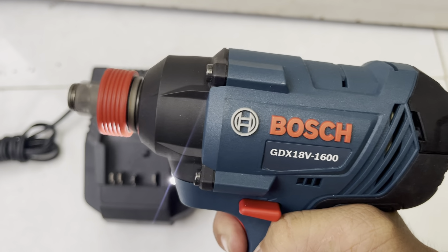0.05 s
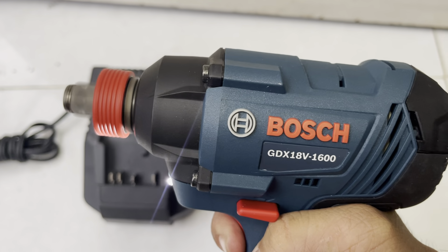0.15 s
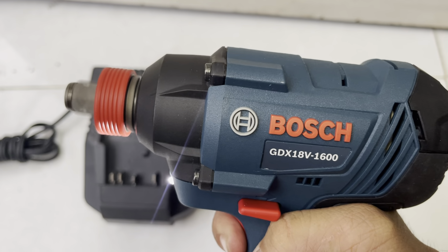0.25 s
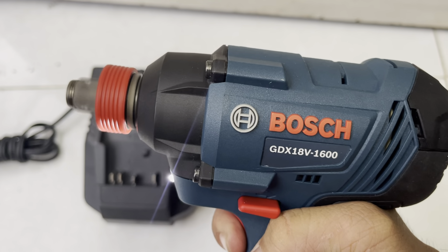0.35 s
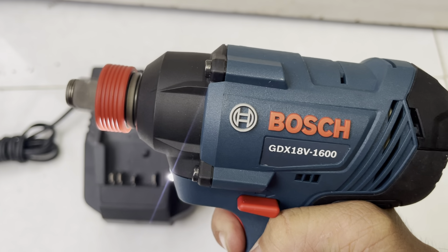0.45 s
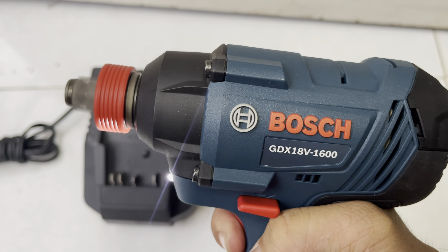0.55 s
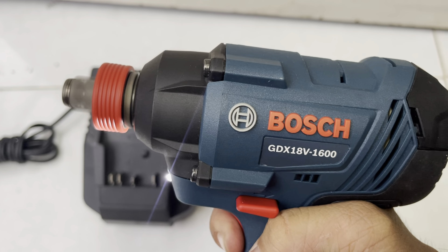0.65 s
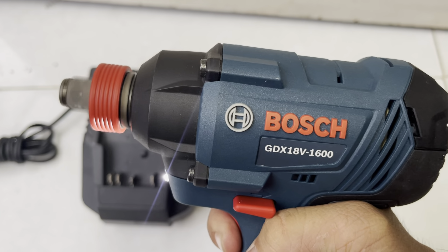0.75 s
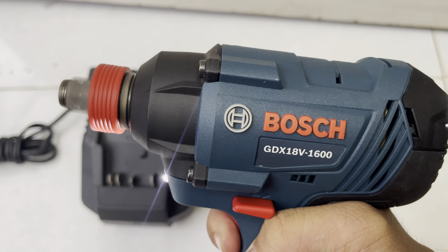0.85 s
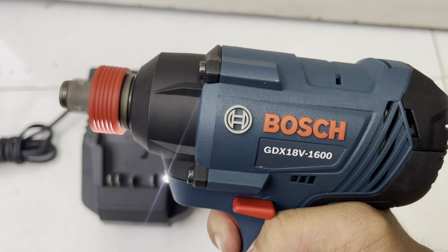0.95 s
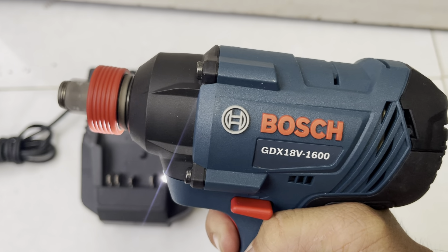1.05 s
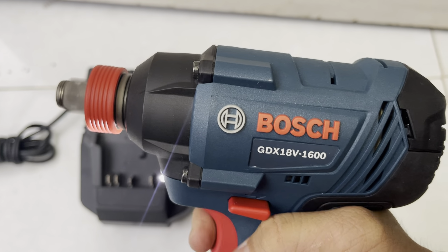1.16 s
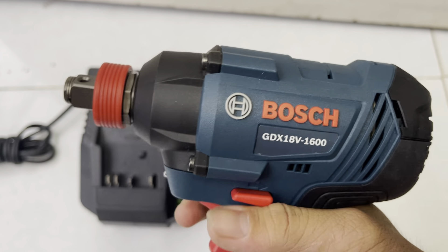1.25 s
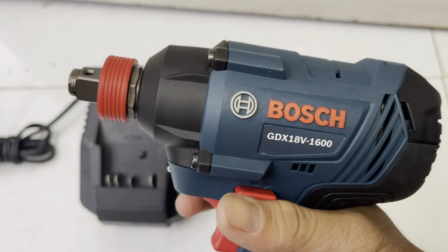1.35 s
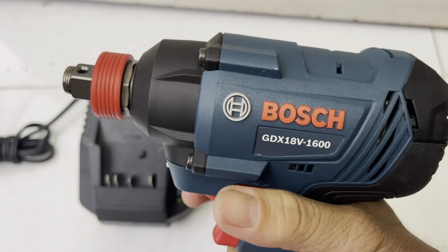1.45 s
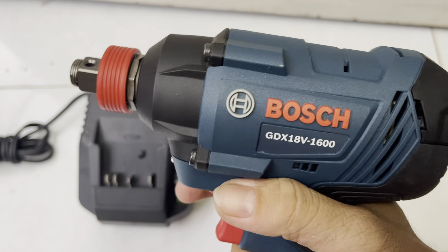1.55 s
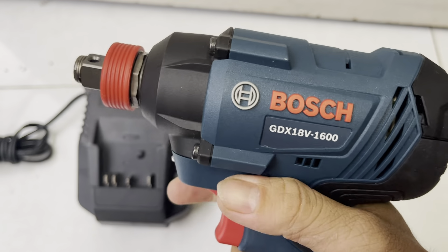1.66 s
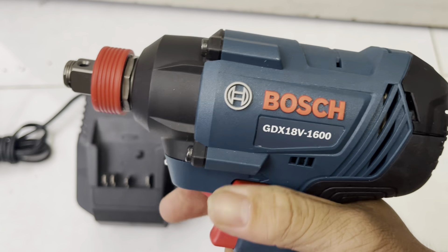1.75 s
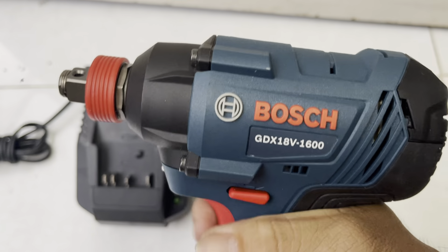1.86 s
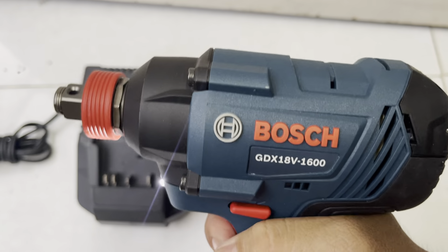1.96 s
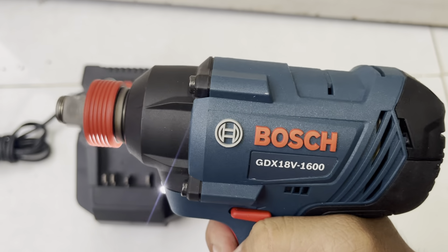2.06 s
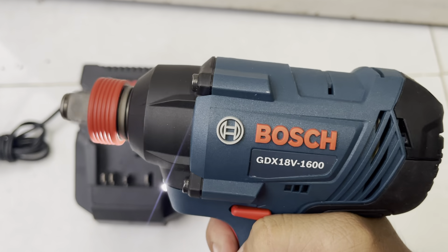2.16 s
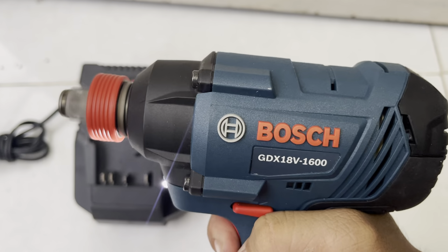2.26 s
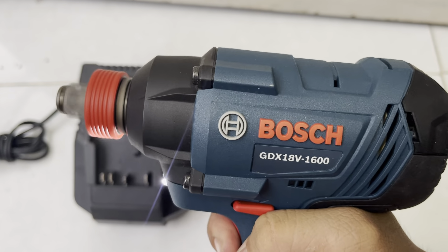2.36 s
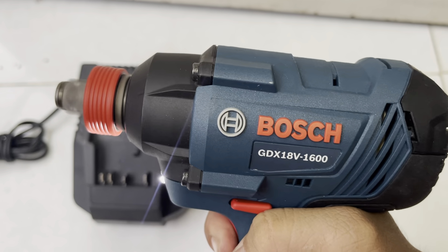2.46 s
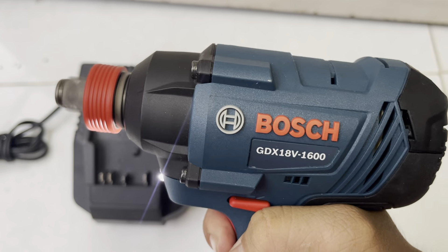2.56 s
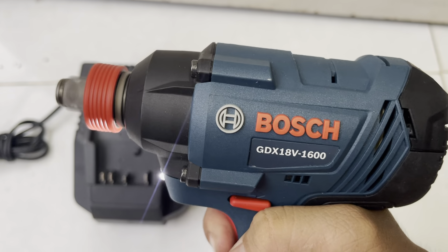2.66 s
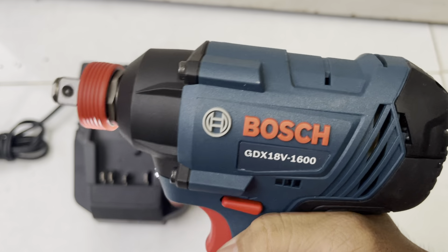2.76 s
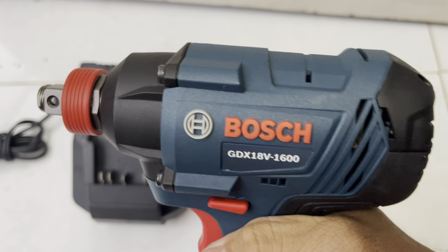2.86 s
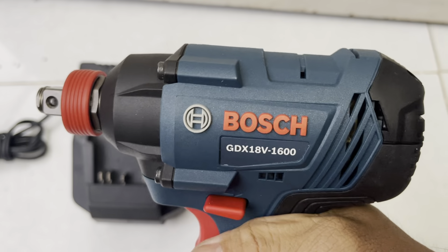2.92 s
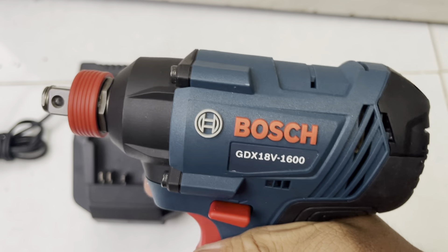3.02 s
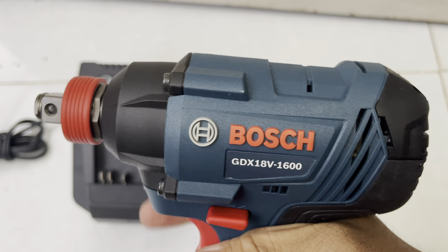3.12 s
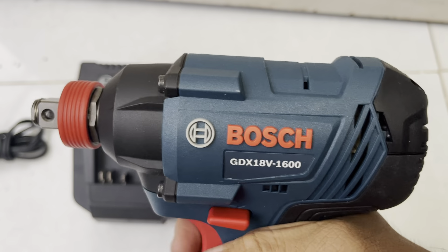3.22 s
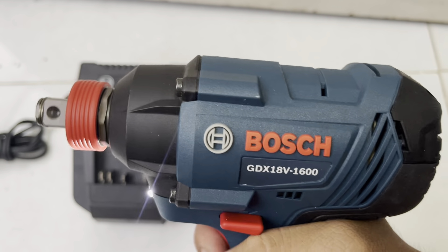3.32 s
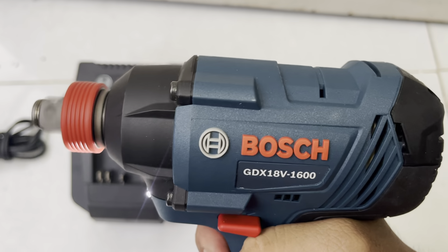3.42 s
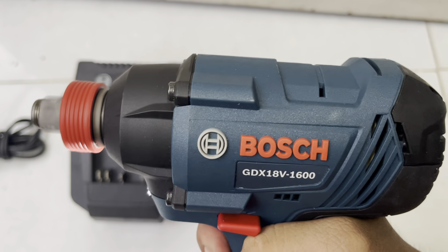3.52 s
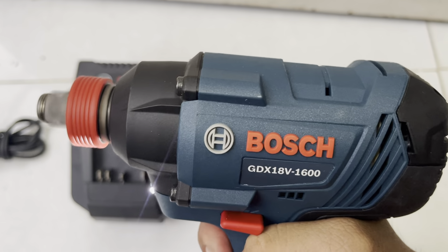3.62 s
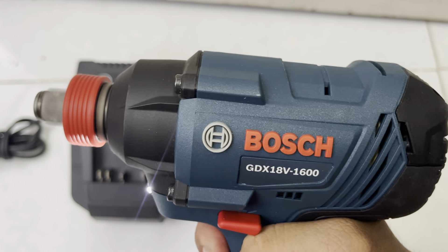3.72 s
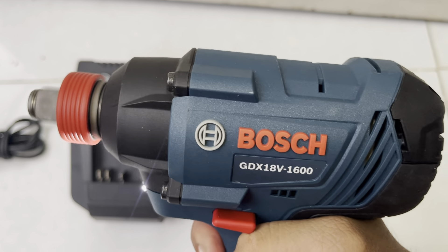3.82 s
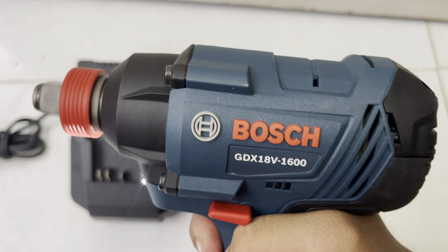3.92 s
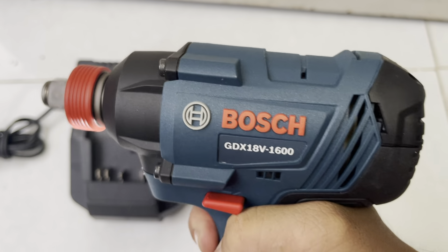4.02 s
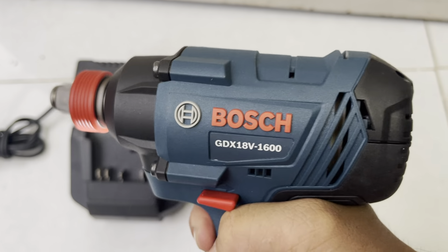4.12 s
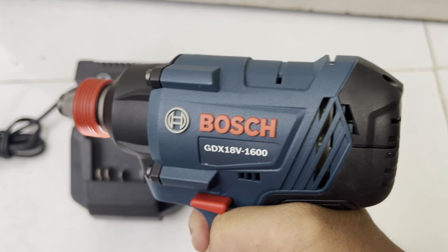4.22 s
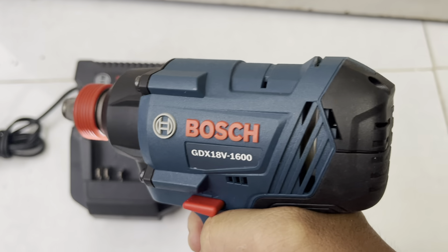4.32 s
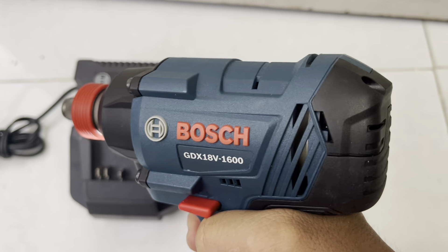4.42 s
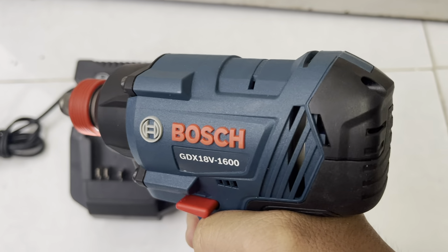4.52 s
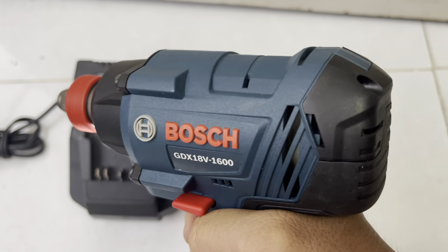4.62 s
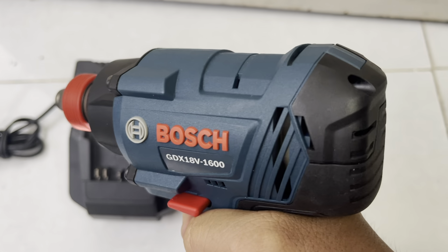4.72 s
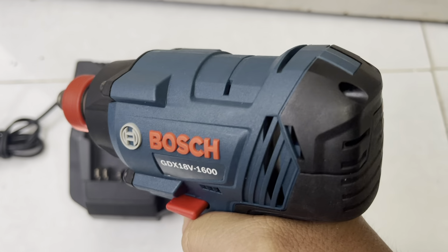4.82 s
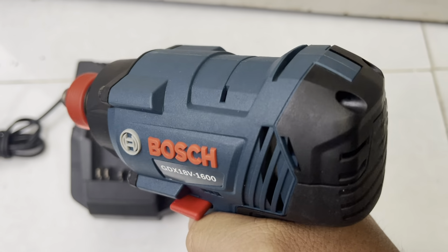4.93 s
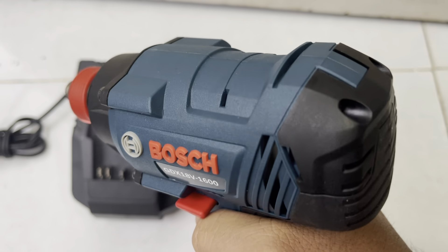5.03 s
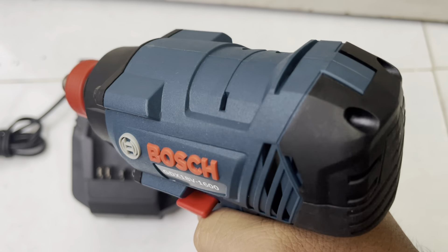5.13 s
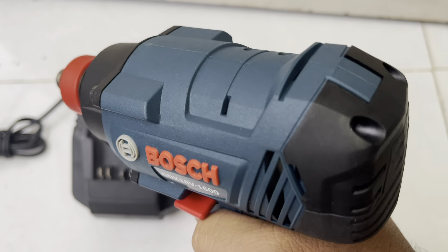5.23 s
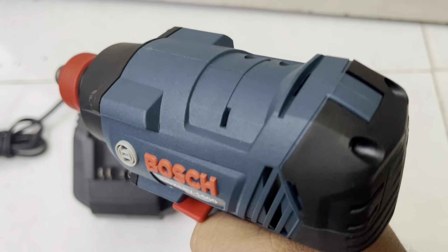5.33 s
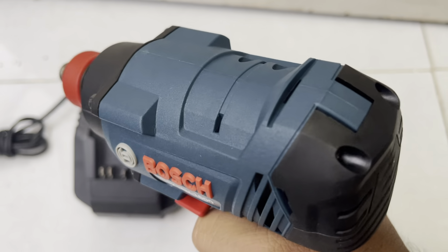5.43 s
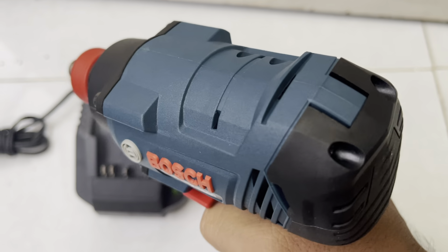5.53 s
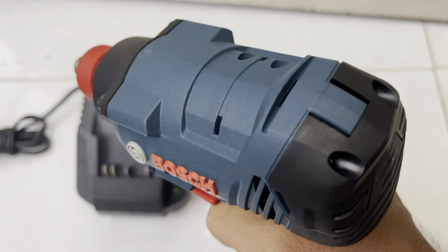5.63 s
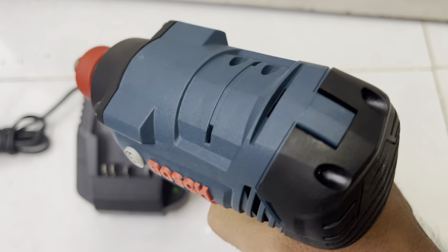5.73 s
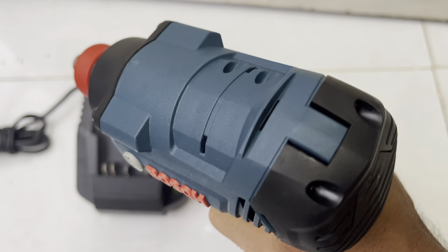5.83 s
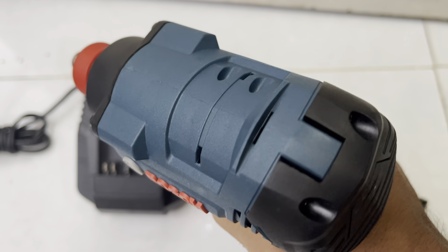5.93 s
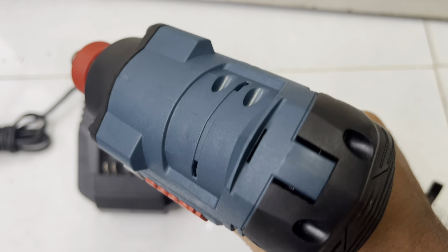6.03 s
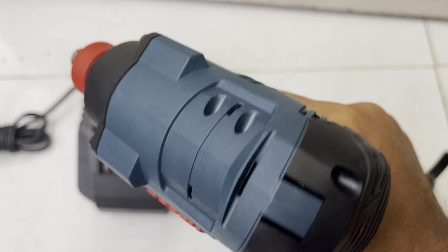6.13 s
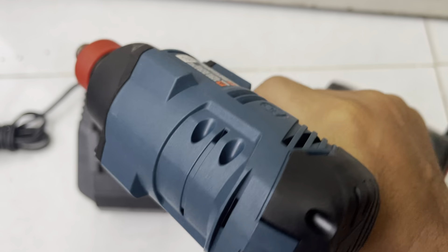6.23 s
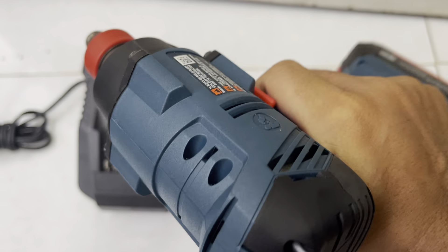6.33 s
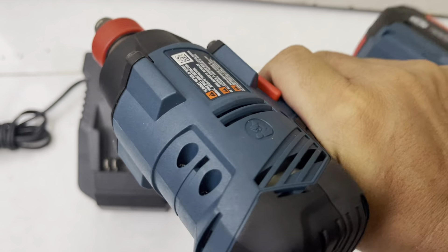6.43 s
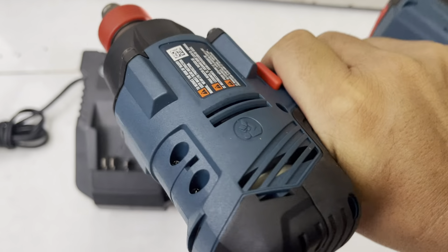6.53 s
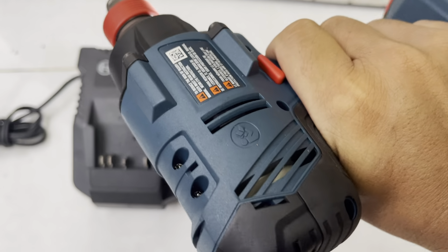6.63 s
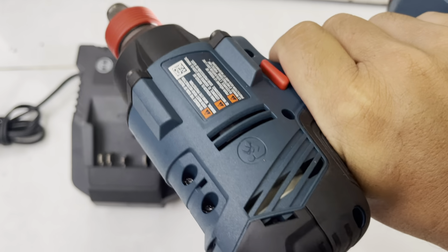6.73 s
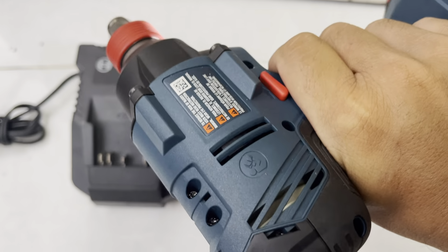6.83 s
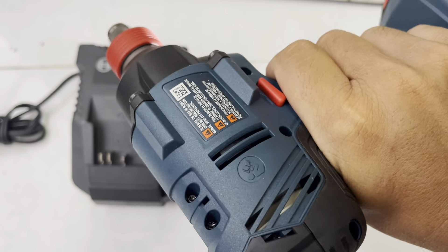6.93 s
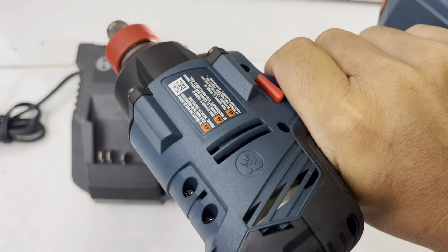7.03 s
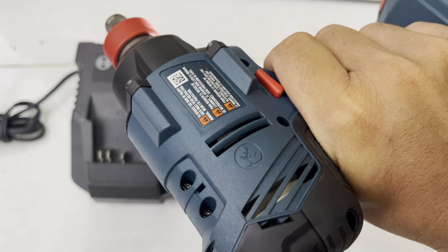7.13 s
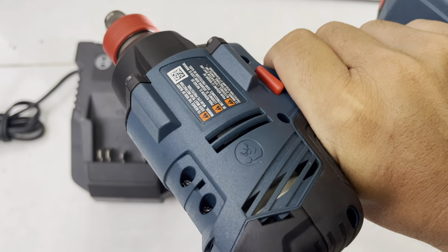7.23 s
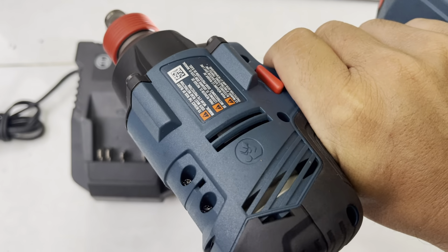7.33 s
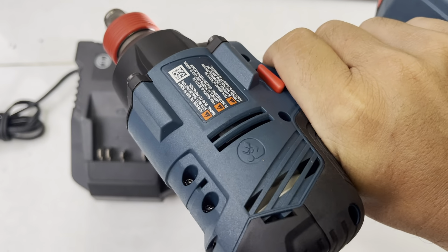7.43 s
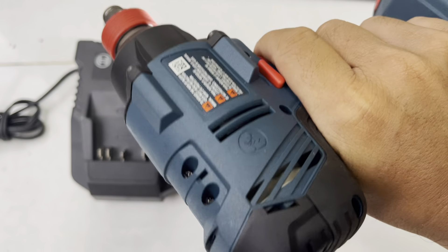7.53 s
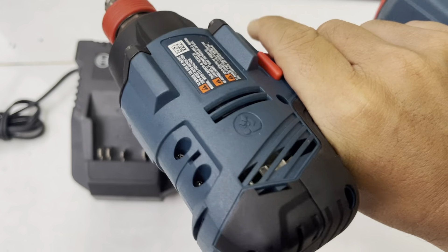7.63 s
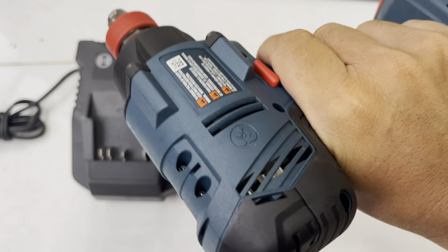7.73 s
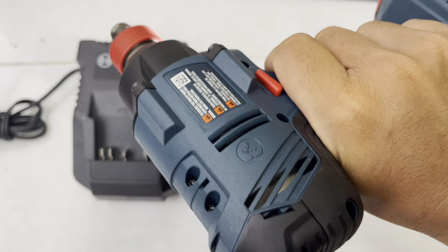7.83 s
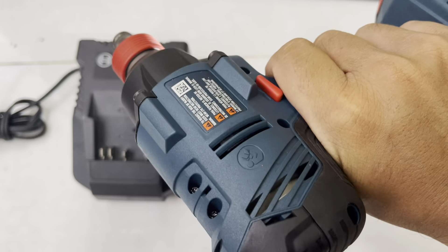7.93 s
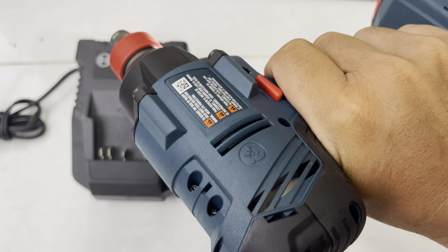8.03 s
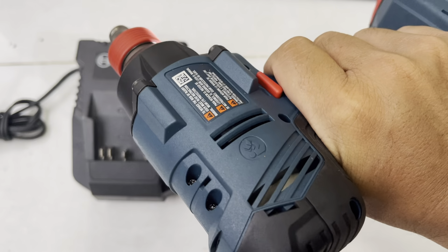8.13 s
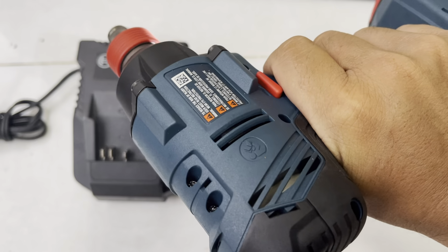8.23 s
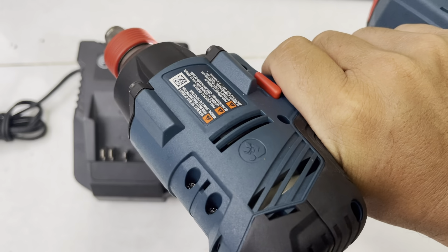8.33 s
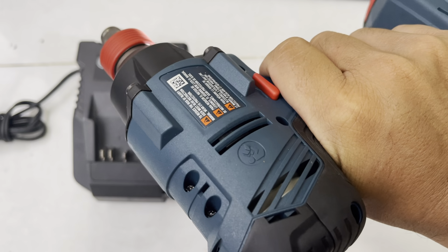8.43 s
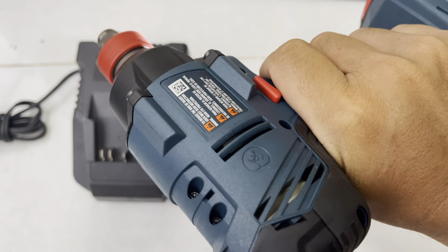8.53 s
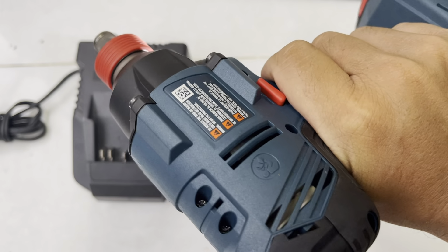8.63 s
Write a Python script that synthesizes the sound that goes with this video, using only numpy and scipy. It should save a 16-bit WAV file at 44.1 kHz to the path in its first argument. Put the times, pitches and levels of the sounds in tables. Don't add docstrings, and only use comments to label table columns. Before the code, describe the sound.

An unloaded battery impact driver runs a hand's width from the microphone, its gear whine over buzzy brush noise and fan hiss. It brakes abruptly, clicks, runs slightly lower in reverse, brakes and snaps into a long forward run. Midway, low windy puffs buffet the microphone and the gear tone softens. A brief stop precedes a final run; a faint distant engine hums beneath, with a short tiled-room tail.

```python
import sys
import numpy as np
from scipy import signal
from scipy.fft import rfft, irfft
from scipy.io import wavfile
from scipy.ndimage import uniform_filter1d

SR = 44100
rng = np.random.default_rng(int(sys.argv[2]) if len(sys.argv) > 2 else 0)


def natural_amplitude(level_db):
    exponent = np.asarray(level_db, float) / 20
    return 10 ** exponent


def wav_record(signal):
    frames = np.transpose(np.atleast_2d(signal))
    bounded = np.clip(frames, -1, 1)
    quanta = np.round(bounded * 32767).astype(np.int16)
    wavfile.write(sys.argv[1], SR, quanta)


N = 382347

# squeezed in seconds, released in seconds, starting whine in dB, whine order per shaft turn.
PULLS = [
    (-1, 1.208, -50, 29.5),
    (1.975, 2.748, -39, 20.3),
    (3.371, 7.543, -53, 30.5),
    (7.833, 9.5, -54, 29.5),
]
CARRIER = 9 / 64
BRAKE_HZ_PER_S = 3900


def unit(x):
    return x / np.sqrt(np.mean(x ** 2))


def band(x, lo_hz, hi_hz, order=2):
    return signal.sosfilt(signal.butter(order, [lo_hz, hi_hz], "bandpass", fs=SR, output="sos"), x)


def colour(x, points):
    hz, db = np.transpose(points)
    f_hz = np.arange(N // 2 + 1) * SR / N
    return irfft(rfft(x) * natural_amplitude(np.interp(np.log(f_hz + 1), np.log(hz), db)), N)


def zone(x, lo_hz, hi_hz):
    f_hz = np.arange(N // 2 + 1) * SR / N
    mask = (np.tanh((f_hz - lo_hz) / 250) - np.tanh((f_hz - hi_hz) / 250)) / 2
    return irfft(rfft(x) * mask, N)


def walk(rate_hz):
    hold = int(SR / rate_hz)
    steps = np.repeat(rng.standard_normal(N // hold + 1), hold)
    return 1.69 * uniform_filter1d(uniform_filter1d(steps, hold), hold)[:N]


def curve(table):
    s, *columns = np.transpose(table)
    return [np.interp(np.arange(N) / SR, s, c) for c in columns]


def tone(turns, multiple, wobble_db, rate_hz):
    phase = 2 * np.pi * (multiple * turns + rng.random())
    return np.sqrt(2) * natural_amplitude(wobble_db * walk(rate_hz)) * np.cos(phase)


def decay(times_s, gains, t60s):
    env, t = np.zeros(N), np.arange(4096) / SR
    for s, gain, t60 in zip(times_s, gains, t60s):
        i = int(s * SR)
        env[i:i + 4096] += gain * np.exp(-np.log(1000) * t / max(t60, .002))
    return env


def pan(x, left_minus_right_db):
    return x * natural_amplitude(np.outer([.5, -.5], left_minus_right_db))


def shaft(free_hz):
    spin_up_hz_per_s, settle_s = 1600, .045
    t = np.arange(N) / SR
    hz, whine, order = np.zeros((3, N))
    knee_hz = spin_up_hz_per_s * settle_s
    for start_s, stop_s, whine_db, multiple in PULLS:
        past_hz = spin_up_hz_per_s * (t - start_s) - free_hz + knee_hz
        eased_hz = knee_hz * np.exp(-np.maximum(past_hz, 0) / knee_hz)
        short_hz = np.where(past_hz < 0, knee_hz - past_hz, eased_hz)
        braked_hz = BRAKE_HZ_PER_S * np.maximum(t - stop_s, 0)
        hz += np.maximum(free_hz - short_hz - braked_hz, 0)
        powered = (t > start_s) * (t < stop_s)
        whine += natural_amplitude(whine_db) * np.minimum(short_hz / knee_hz, 1) ** 2 * powered
        order[t > start_s] = multiple
    return hz, whine, np.cumsum(hz * order) / SR


def brush_and_fan_noise(turns):
    # frequency in Hz, level in dB per Hz.
    housing = [(150, -38.5), (500, -11), (1100, -2), (1450, 1), (1800, -4), (2500, 1), (3300, -4.5),
               (4000, -18.5), (4800, -13), (5600, -14.5), (7000, -13.5), (9700, -4.5), (11200, -5),
               (13000, -17.5)]
    puff = 1 + 0.12 * np.cos(2 * np.pi * turns) + 0.05 * np.cos(4 * np.pi * CARRIER * turns)
    sparks = natural_amplitude(2.0 * np.minimum(rng.exponential(size=N), 6))
    return colour(rng.standard_normal(N) * puff * sparks, housing)


def vent_cavity(noise, rumble_db):
    # centre in Hz, width in Hz, rows of time in seconds and level in dB over the rumble.
    cavity = (1425, 57, [(0, -14), (5.3, -12.5), (6.3, 1), (8.67, -.5)])
    hz, width_hz, facing = cavity
    ring = unit(band(noise, hz - width_hz / 2, hz + width_hz / 2, order=1))
    return natural_amplitude(rumble_db + curve(facing)[0]) * ring


def motor(hz, turns, db5, db20, levels_db, reverse):
    # multiple of shaft, forward in dB, reverse in dB, both over their noise band.
    orders = [(3, -14, -20), (4, -30, -13), (9, -8, -9), (10, -1, 2), (11, -17, -10), (13, -24, -16),
              (15, -15, -22), (17, -24, -17), (18, -21, -8), (19, -20, -13), (21, -22, -11), (23, -30, -13),
              (24, -24, -30), (25, -18, -27), (28, -18, -17), (29, -6, -10), (30, -10, -20), (32, -15, -20),
              (33, -10, -16), (34, -8, -26), (35, -11, -13), (36, -16, -30), (37, -16, -13), (38, -18, -30),
              (39, -20, -13), (40, -15, -12), (41, -24, -16)]
    # slice from/to Hz, level reference from/to Hz, last order in the slice
    slices = ((-900, 3400, 700, 1350, 11), (3400, 6700, 3500, 6000, 21), (6700, 17000, 7000, 9800, 99))
    noise = brush_and_fan_noise(turns)
    out = natural_amplitude(db5) * tone(turns, 5, 0.62, 10) + natural_amplitude(db20) * tone(turns, 20, 0.5, 12)
    db2 = db5 + np.where(reverse, -21, -11)
    out += np.minimum(hz / 300, 1) ** 6 * natural_amplitude(db2) * tone(turns, 2, 1.5, 6)
    out += natural_amplitude(levels_db[0] - 15) * tone(turns, 1, 1.6, 4.6)
    out += vent_cavity(noise, levels_db[0])
    settled = .8 * np.minimum(hz / 285, 1) ** 4
    first = 0
    for db, (lo_hz, hi_hz, ref_lo_hz, ref_hi_hz, last) in zip(levels_db, slices):
        reference = np.std(band(noise, ref_lo_hz, ref_hi_hz, order=4))
        part = zone(noise, lo_hz, hi_hz) / reference * natural_amplitude(.8 * walk(15))
        for multiple, forward_db, reverse_db in orders:
            if first < multiple <= last:
                order_db = np.where(reverse, reverse_db, forward_db)
                part += settled * natural_amplitude(order_db) * tone(turns, multiple, 1.5, 2)
        out += natural_amplitude(db) * part
        first = last
    return out


def gearbox(turns, db56, db54, pan_db, reverse):
    # carrier multiple, level in dB relative to the 56 line joined in power by overtone level plus 9.5
    # dB.
    sidebands = [(55, -17), (57, -17), (58, -14.5)]
    # carrier multiple, level in dB relative to the 54 line.
    overtones = [(52, -14), (108, -17), (109, -16), (110, -17), (111, -17), (164, -22), (166, -21)]
    carrier = turns * CARRIER
    rattle = 1 + 0.16 * unit(band(rng.standard_normal(N), 2.8, 240, order=1))
    mesh = []
    for lead_turns in (0, .04):
        upper = np.cos(2 * np.pi * (56 * carrier - lead_turns))
        lower = np.cos(2 * np.pi * (54 * carrier - lead_turns / 2))
        mesh.append(np.sqrt(2) * rattle * (natural_amplitude(db56) * upper + natural_amplitude(db54) * lower))
    overtone_db = db54 - 13 * reverse
    side_gain = np.hypot(natural_amplitude(db56), natural_amplitude(overtone_db + 9.5))
    extra = side_gain * sum(natural_amplitude(db) * tone(carrier, m, 1.4, 2.88) for m, db in sidebands)
    extra += natural_amplitude(overtone_db) * sum(natural_amplitude(db) * tone(carrier, m, 2, 2.71) for m, db in overtones)
    return natural_amplitude(-0.75) * pan(np.array(mesh) + extra, pan_db)


def room(x):
    t = np.arange(SR // 3) / SR
    t60_s, gap_s = .18, .004
    tails = rng.standard_normal((2, len(t))) * np.exp(-np.log(1000) * t / t60_s) * (t > gap_s)
    dull = band(x, 200, 6500, order=3)
    return np.array([signal.fftconvolve(dull, h / np.sqrt(np.sum(h ** 2)))[:N] for h in tails])


def gusts(fan_db):
    # time in seconds, buffet in dB.
    stir = [(0, -54), (.6, -61), (2, -48.5), (3.3, -49), (3.7, -53), (6.1, -52), (6.4, -56), (6.6, -65),
            (7.05, -62), (7.25, -54), (7.55, -58), (8.1, -48), (8.5, -52)]
    # start in seconds, hold in seconds, buffet in dB, grit in dB above it.
    blows = [(2.78, .01, -40, -9), (4.17, .01, -37, -5), (4.25, .2, -41, -9), (4.49, .1, -20, -6),
             (4.63, .18, -15.5, -8), (4.95, .42, -44, -5), (5.33, .01, -39, -4), (5.64, .06, -41, -1.5),
             (5.73, .06, -33, -9), (5.8, .05, -34, .5), (5.9, .15, -37.5, -3), (8.65, .05, -41, -12)]
    rise_db_per_s, fall_db_per_s, grit_offset_db = 350, 150, -7
    fan_stirs = .7
    t, stir_db = np.arange(N) / SR, curve(stir)[0]
    low = natural_amplitude(stir_db) ** 2
    fan_power = natural_amplitude(fan_db + fan_stirs * (stir_db - np.mean(stir_db))) ** 2
    grit = low * natural_amplitude(grit_offset_db) ** 2 + fan_power
    for s, held_s, db, grit_db in blows:
        rise_db = rise_db_per_s * np.maximum(s - t, 0)
        fall_db = fall_db_per_s * np.maximum(t - s - held_s, 0)
        gust = natural_amplitude(db - rise_db - fall_db) ** 2
        low = low + gust
        grit = grit + gust * natural_amplitude(grit_db) ** 2
    return 10 * np.log10(low), 10 * np.log10(grit)


def draught(fan_db):
    # frequency in Hz, level in dB per Hz.
    buffet = [(15, -50), (28, -24), (50, -3), (91, 0), (140, -7), (200, -20), (300, -40)]
    # start in seconds, peak in dB, pitch scale in Hz (used up to 420; start near 2.4
    # times it plus 90 Hz).
    eddies = [(4.459, -22, 364), (4.501, -20.5, 369), (4.556, -29, 312), (4.627, -19, 447),
              (4.684, -18, 337), (4.756, -18, 347), (4.807, -8, 342), (4.95, -24, 375), (5.003, -22.5, 353),
              (5.499, -28, 627), (5.637, -25, 441), (5.675, -24.5, 899), (5.743, -23.5, 342),
              (5.795, -22, 360), (5.888, -23.5, 638), (6.07, -28, 676)]
    low_db, grit_db = gusts(fan_db)
    low = unit(colour(rng.standard_normal(N), buffet)) * natural_amplitude(1.23 * walk(23))
    patter_db = np.clip((low_db + 60) / 4, 1, 3.6) * walk(90)
    patter = rng.standard_normal(N) * natural_amplitude(patter_db)
    grit_shape = [(90, -8), (170, 1.5), (330, -0.5), (600, -10.5), (950, -21), (1400, -49)]
    grit = unit(colour(patter, grit_shape))
    out = natural_amplitude(low_db - 5.5) * low + natural_amplitude(grit_db - 2.1) * grit
    t = np.arange(1500) / SR
    env = np.minimum(t / 0.0037, 1) * np.exp(-t / .007)
    for s, db, hz in eddies:
        cycles = 2.153 * min(hz, 420) * 0.00588 * (1 - np.exp(-t / 0.0053)) + 90 * t
        i = int(s * SR)
        out[i:i + 1500] += natural_amplitude(db) * np.sin(2 * np.pi * cycles) * env
    return out


def background():
    # time in seconds, pitch in Hz, level in dB.
    engine = [(0, 189, -52), (1.2, 190, -54), (1.7, 190, -49), (4.2, 190, -50), (4.9, 190, -54),
              (6.2, 191, -59), (7, 191, -58), (7.3, 191, -50), (7.62, 189, -50), (7.8, 178, -47),
              (8, 158, -52), (8.3, 143, -53), (8.67, 135, -56)]
    # frequency in Hz, level in dB per Hz.
    floor = [(150, -3), (250, -2.5), (1490, -9.5), (2570, -10.5), (3760, -23), (8740, -22.5), (10100, -17),
             (11400, -15), (12400, -42), (13000, -49), (16900, -79), (22000, -120)]
    floor_db = -58.5
    hz, db = curve(engine)
    hum = natural_amplitude(db) * tone(np.cumsum(hz * (1 + .012 * walk(12))) / SR, 1, 1.6, 9)
    shape = [(120, -40)] + list(floor)
    mid, side = (unit(colour(rng.standard_normal(N), shape)) * natural_amplitude(1.2 * walk(4)) for _ in range(2))
    mid *= natural_amplitude(6.5 * np.exp(-((np.arange(N) / SR - 3.2) / 0.28) ** 2))
    return hum + natural_amplitude(floor_db) * (mid + .3 * side * np.array([[1], [-1]]))


def brake_squeal(turns):
    # grab in seconds, squeal in dB.
    grabs = [
        (1.211, -22),
        (2.756, -37),
        (7.544, -27),
    ]
    s, db = np.transpose(grabs)
    grab = uniform_filter1d(decay(s, natural_amplitude(db), [.045] * len(s)), size=90)
    return grab * (tone(turns, 29.5, 2.5, 300) + tone(turns, 37.5, 2.5, 300))


def switches():
    # time in seconds, peak in dB, t60 in seconds, body in dB over the crack.
    clicks = [(1.3857, -42, 0.014, -22), (1.4411, -46, 0.014, -12), (1.546, -29, 0.024, -9),
              (1.5522, -28.5, 0.018, 0), (1.634, -43, 0.014, -14), (1.736, -41, 0.014, -15),
              (1.8074, -43, 0.014, -6), (1.8454, -37.5, 0.014, -8), (1.92, -42, 0.016, -3),
              (2.022, -9, 0.014, -9), (2.7924, -22, 0.014, -2), (2.9655, -25, 0.024, -8),
              (3.0879, -39, 0.014, -13), (3.266, -50, 0.016, 5), (3.3233, -40, 0.016, -6),
              (3.4336, -3, 0.014, -16), (7.7817, -46, 0.014, -4), (7.869, -14, 0.014, -15)]
    # time in seconds, peak in dB, t60 in seconds, body in dB
    start_clicks = [
        (2.0225, -0.5, 0.0058, -8.5),
        (3.4362, -5.5, 0.014, -11),
    ]
    # start in seconds, end in seconds, pitch in Hz, level in dB.
    part_trigger = (7.815, 7.9, 10000, -50)
    s, db, t60_s, body_db = np.transpose(list(clicks) + list(start_clicks))
    crack_shape = [(1500, -75), (4500, -2), (6500, -4), (9000, 5.5), (11500, 9.5), (14000, -45)]
    crack = unit(colour(rng.standard_normal(N), crack_shape))
    body = unit(band(rng.standard_normal(N), 1500, 4000))
    t = np.arange(N) / SR
    t0, t1, hz, whistle_db = part_trigger
    fade = np.interp(t, [t0, t0 + .02, t1 - .02, t1], [0, 1, 1, 0])
    whistle = natural_amplitude(whistle_db) * fade * np.sin(2 * np.pi * hz * t)
    cracks = crack * decay(s, natural_amplitude(db - 6), t60_s)
    bodies = body * decay(s, natural_amplitude(db + body_db - 6), 1.6 * t60_s)
    return cracks + bodies + whistle


def starting_whine(whine, whine_turns, slow_db):
    return whine * natural_amplitude(1.8 * slow_db) * tone(whine_turns, 1, 2.2, 60)


def scene():
    # time in seconds, free shaft speed in Hz, tool gain in dB, roll onto its
    # back 0-1, gear-mesh lobe toward the phone in dB.
    pose = [(0, 311.2, 0, 0, 0), (.4, 312.2, -1, 0, 0), (.6, 314.0, -4, 0, 1), (1.2, 314.8, -5, 0, 1),
            (2.8, 315.8, -1, 0, 0), (3.5, 315.5, 1, 0, -2), (4.05, 316.7, 0, 0, -.5),
            (4.23, 316.2, -4, 0, 0), (4.45, 315.6, -3.5, 0, -2), (5.03, 316.3, -3, 0, 0),
            (5.4, 316.6, -2, .3, -8), (6.1, 317.4, -2, .9, -23), (6.57, 317.6, -4, 1, -6),
            (6.97, 318.0, -4, 1, -16), (7.55, 317.4, -4, 1, -16), (8.1, 314.5, -3, .8, -10),
            (8.33, 316.0, -2, .7, -16), (8.67, 317.6, -2, .7, -17)]
    # full-speed level in dB, share of tool gain, rolled change in dB, reverse change in dB, power of
    layers = [
        (-18.9, 1.01, 0.1, -18, 3.1),
        (-34, 1.1, -.6, 4.8, 1.9),
        (-32.3, 1.3, -11.5, -1.5, 3.8),
        (-37.5, 1.2, -5, -13, 9),
        (-41, 1.01, -2.8, 1.2, .95),
        (-37, 1.01, -1.2, -.5, .9),
        (-33.7, .8, 1.1, .2, 1.15),
        (-47.5, .4, -4, 1.5, 1.1),
    ]
    trims_db = (2, 0.5, 1.5)
    reverse_speed, brake_hush = .8992, 1.4
    brake_slack_db, reverse_slack_db = -9, -.5
    t = np.arange(N) / SR
    reverse = (t > PULLS[1][0]) & (t < PULLS[2][0])
    free_hz, tool_gain_db, rolled, lobe_db = curve(pose)
    free_hz = free_hz * np.where(reverse, reverse_speed, 1)
    hz, whine, whine_turns = shaft(free_hz)
    turns = np.cumsum(hz) / SR
    hz_per_s = np.gradient(hz) * SR

    speed_db = 20 * np.log10(np.maximum(hz / free_hz, 1e-4))
    speed_db *= np.where(hz_per_s < -BRAKE_HZ_PER_S / 2, brake_hush, 1)
    layer_db = []
    for db, share, rolled_db, reverse_db, power in layers:
        held_db = db + share * tool_gain_db + rolled_db * rolled
        layer_db.append(held_db + reverse_db * reverse + power * speed_db)
    db56, db54, db5, db20, *levels_db, fan_db = layer_db
    db56 = db56 + lobe_db
    levels_db = [db + trim for db, trim in zip(levels_db, trims_db)]

    slow_db = 60 * np.log10(np.clip(hz / 130, .01, 1))
    slack_db = np.where(reverse, reverse_slack_db, brake_slack_db)
    slow_db += np.clip(hz_per_s / 400, slack_db, 1.5)
    db56, db54, db5, db20 = (db + slow_db for db in (db56, db54, db5, db20))

    tool = motor(hz, turns, db5, db20, levels_db, reverse) + brake_squeal(turns)
    tool = pan(tool + switches() + starting_whine(whine, whine_turns, slow_db), 0.8)
    gear_pan_db = 6.7 - 4 * rolled - 1.5 * reverse
    gears = gearbox(turns, db56, db54, gear_pan_db, reverse)
    tail = natural_amplitude(-12.5) * room((tool + natural_amplitude(-7) * gears).mean(axis=0))
    return tool + gears + tail + draught(fan_db) + background()


def top_cut(x):
    return signal.sosfilt(signal.butter(12, 13140, fs=SR, output="sos"), x)


def record(dry):
    # frequency in Hz, lead of the left port in radians.
    port_lead = [(0, .38), (600, .3), (1100, -.1), (2100, .2), (2600, 1.0), (3300, .85), (4100, .15),
                 (5500, .9), (6400, .2), (7600, .9), (8600, 0), (10100, -3.0), (12100, -6.3), (13100, -8.9)]
    hz, lead_rad = np.transpose(port_lead)
    lag = np.exp(-1j * np.interp(np.arange(N // 2 + 1) * SR / N, hz, lead_rad))
    wet = np.array([dry[0], irfft(rfft(dry[1]) * lag, N)])
    wet = .84 * np.tanh(wet / .84)
    return top_cut(wet)


dry = scene()
out = record(dry)
wav_record(out)
```